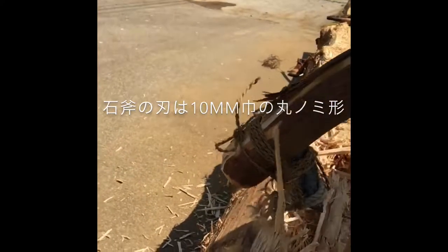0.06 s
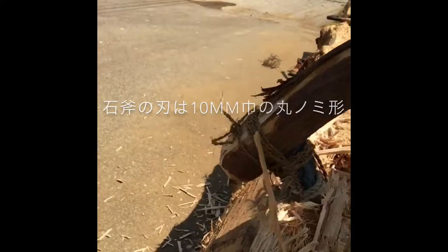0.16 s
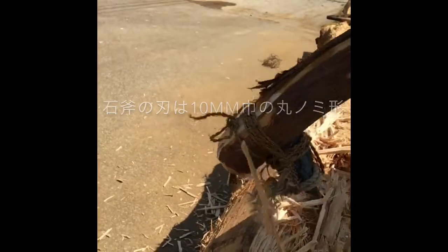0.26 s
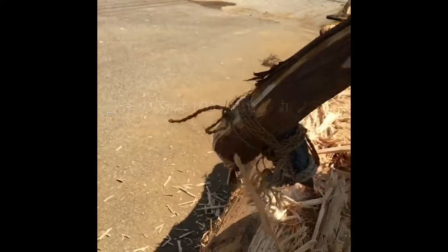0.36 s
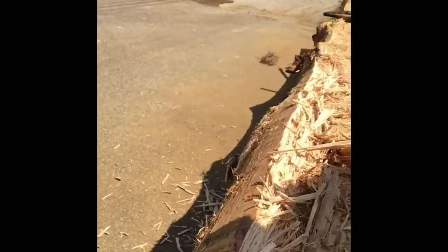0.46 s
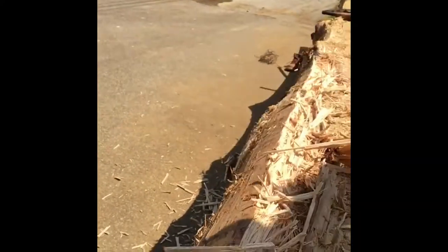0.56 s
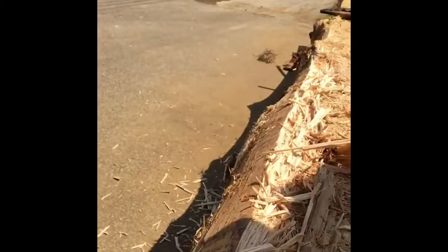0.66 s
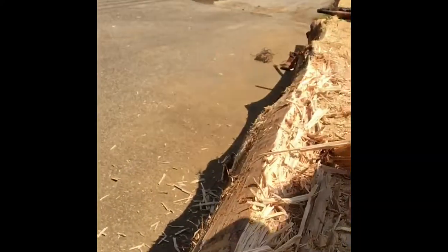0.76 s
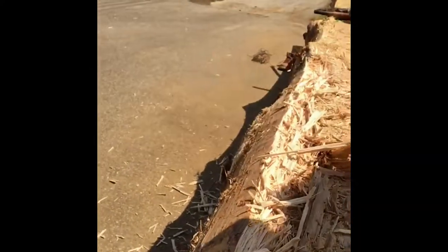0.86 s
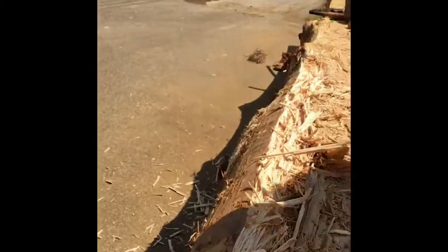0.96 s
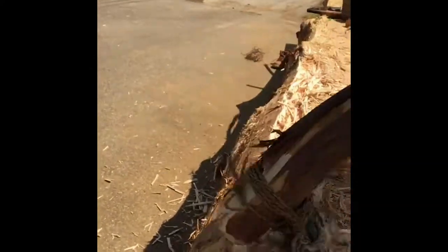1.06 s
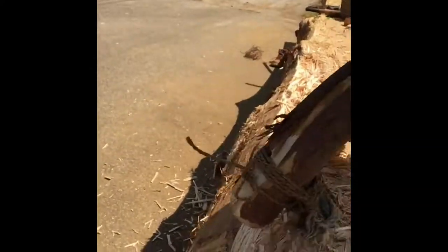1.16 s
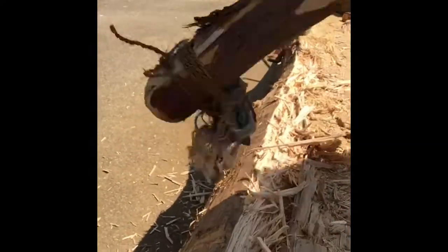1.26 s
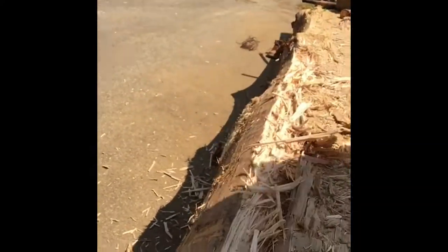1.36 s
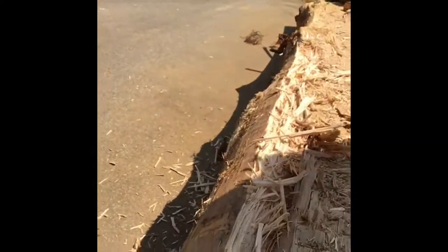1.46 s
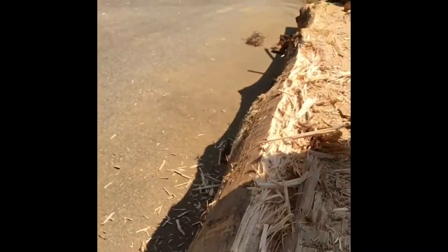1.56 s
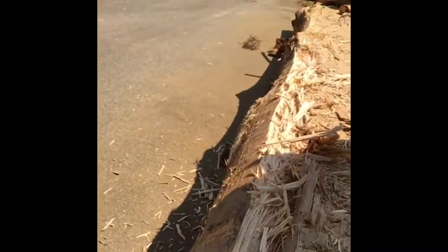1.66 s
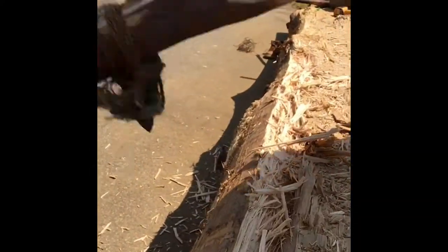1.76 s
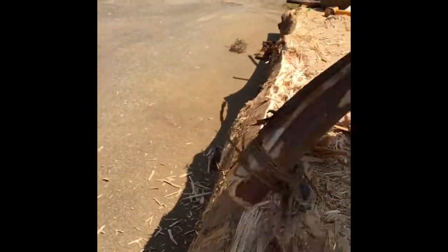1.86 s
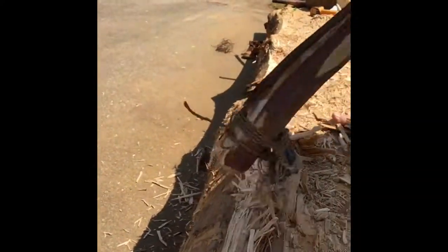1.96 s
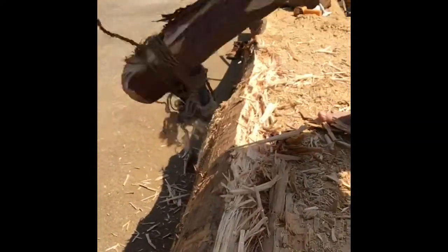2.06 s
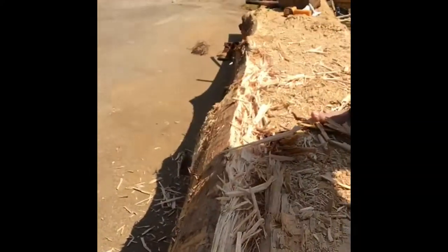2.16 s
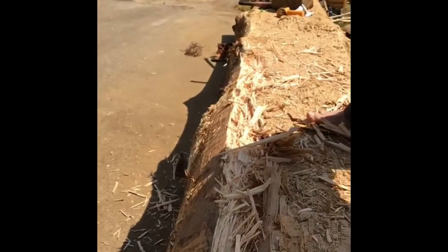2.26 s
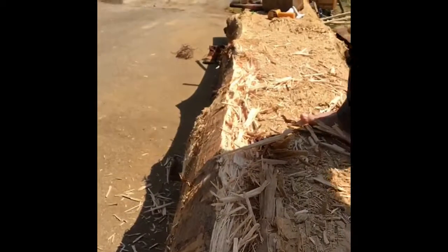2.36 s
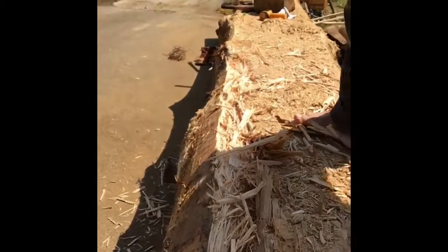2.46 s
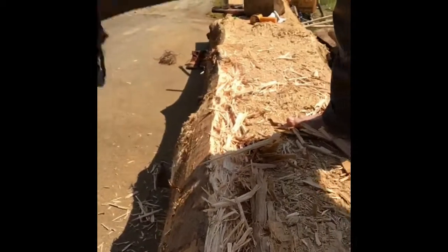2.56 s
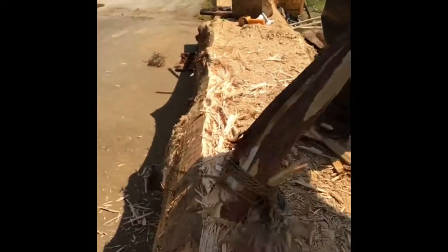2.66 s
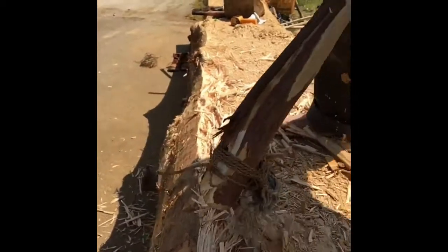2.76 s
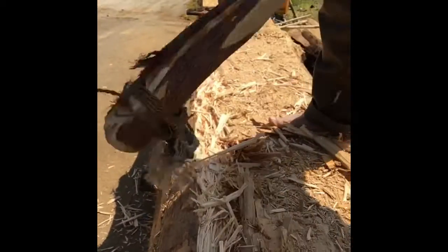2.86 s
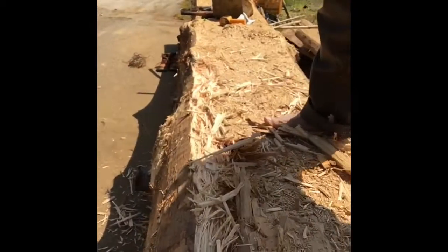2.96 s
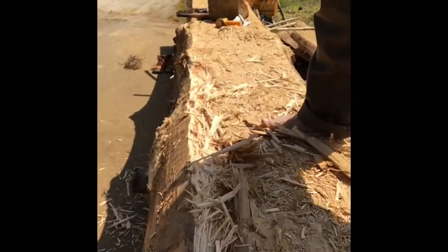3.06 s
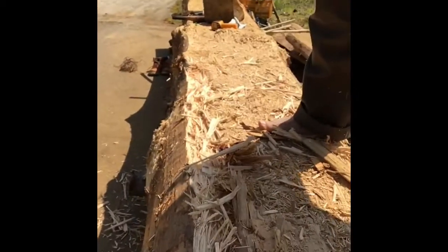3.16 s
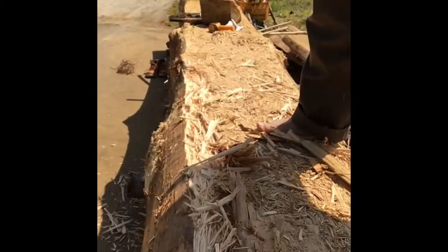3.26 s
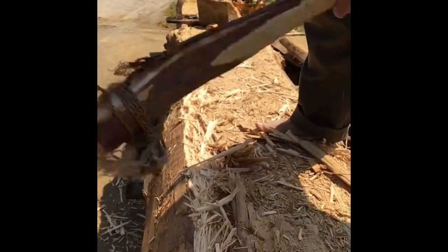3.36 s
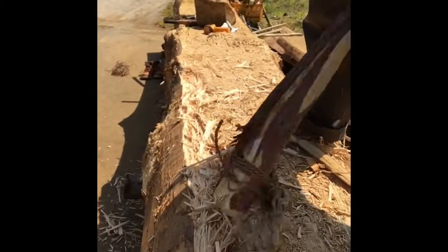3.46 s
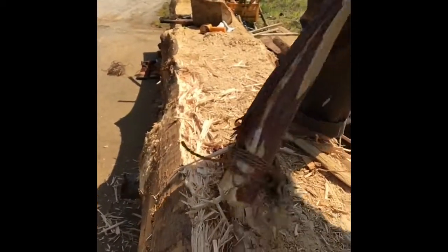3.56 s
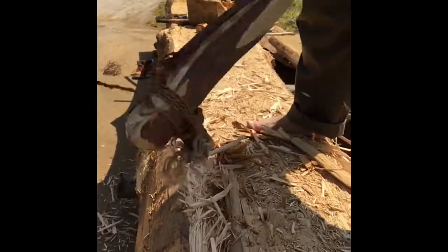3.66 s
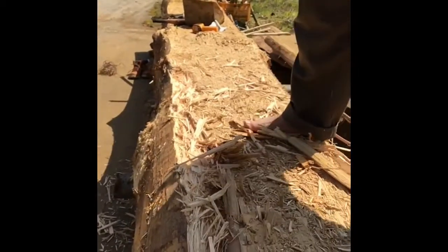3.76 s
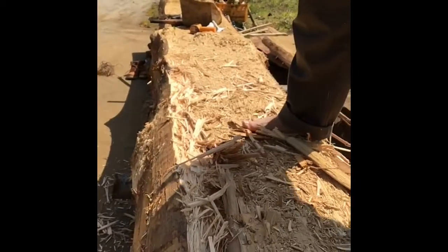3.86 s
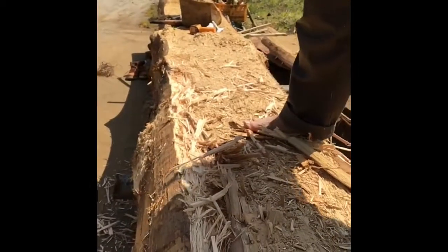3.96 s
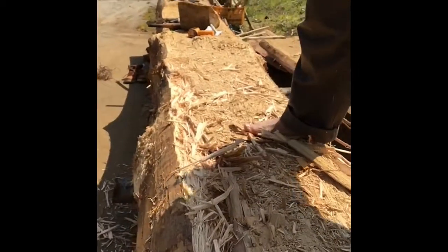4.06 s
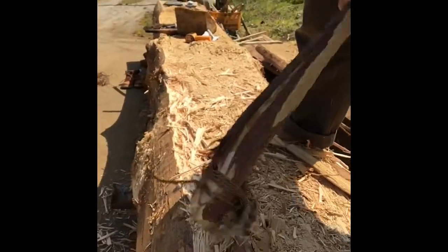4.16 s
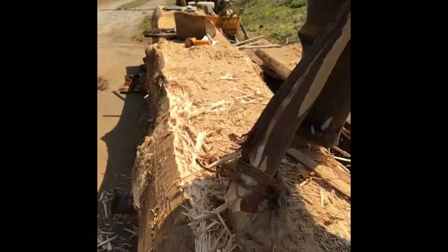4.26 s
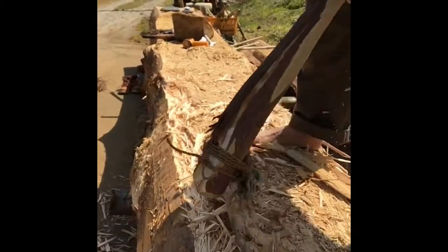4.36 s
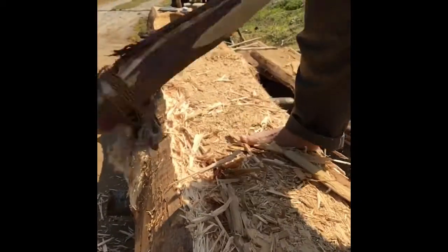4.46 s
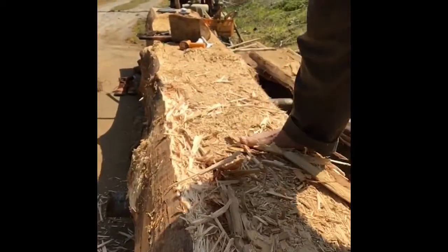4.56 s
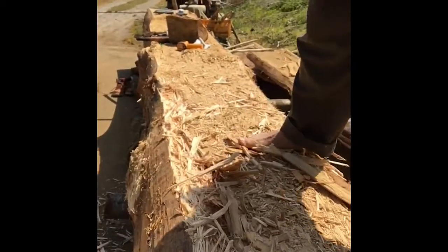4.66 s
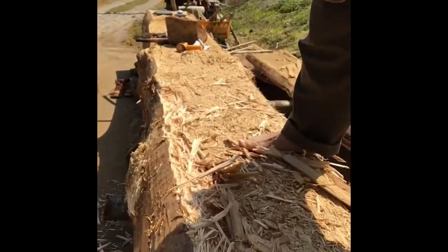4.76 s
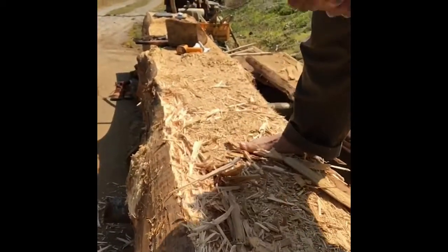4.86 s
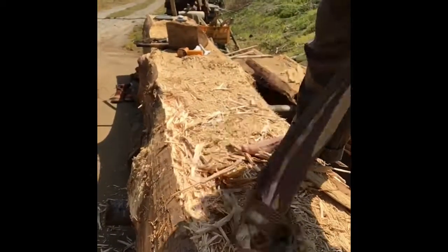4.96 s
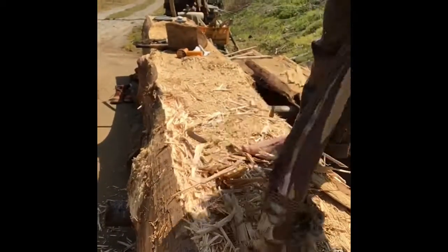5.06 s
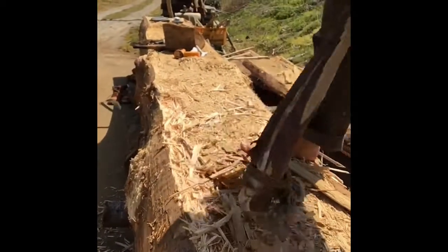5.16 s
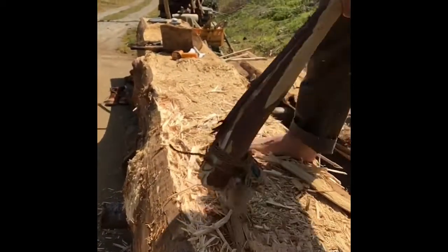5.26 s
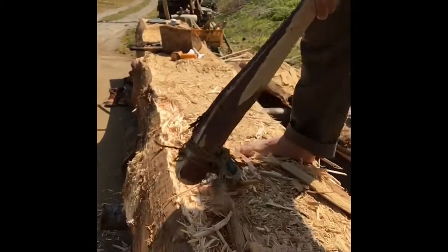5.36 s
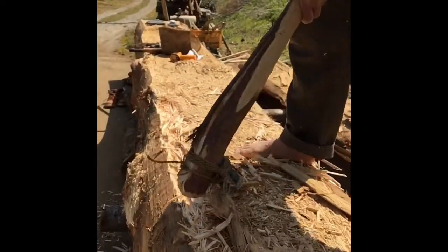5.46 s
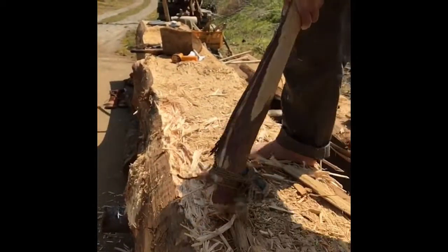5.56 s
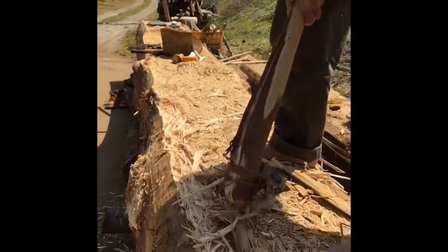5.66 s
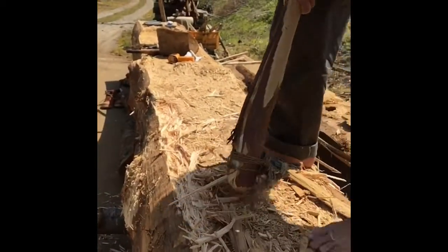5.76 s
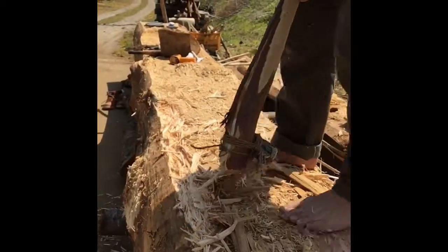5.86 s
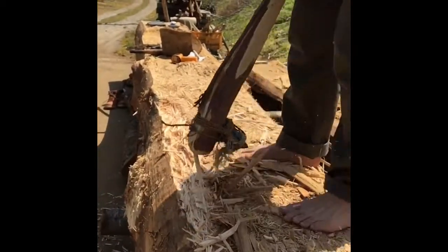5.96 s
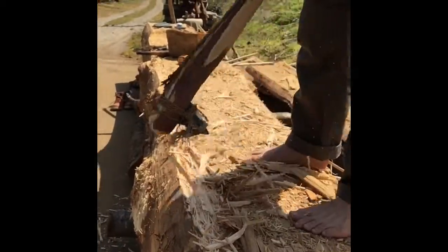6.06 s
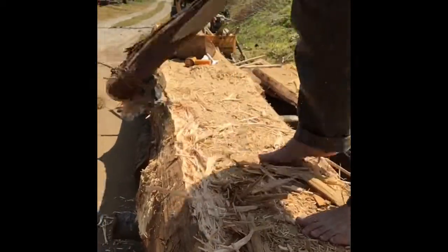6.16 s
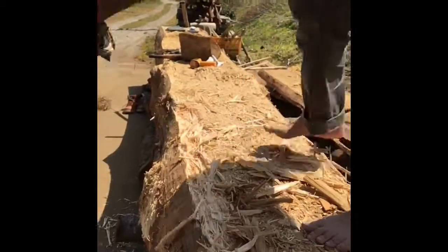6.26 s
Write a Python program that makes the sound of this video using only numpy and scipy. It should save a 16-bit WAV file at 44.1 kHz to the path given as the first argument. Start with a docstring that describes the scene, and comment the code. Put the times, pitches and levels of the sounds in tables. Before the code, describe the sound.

Half a second of silence, then the fading low ring of an earlier blow. A stone adze hits a long log six times, about every 0.8 seconds: a crisp fibrous crunch, a short woody knock and a deep trunk hum. Chips tick between blows. Wind thumps grow on the close, single-channel microphone outdoors; distant traffic roars faintly. Lastly a bare foot drags through crackling shavings.

```python
"""A stone adze is driven into a long log on open ground: each blow crushes fibres, knocks and rings the trunk.
Chips and twigs tick as short noise bursts; shavings rustle as crackles over hiss, also under a dragging bare foot.
Wind rumbles and buffets the microphone; far traffic is a smooth noise roar with faint wavering tones.
After half a second of silence the sound opens on the ring of an earlier blow.
Levels are those of the single layers, before the final gain and rounding."""
import sys
import numpy as np
from scipy import signal
from scipy.fft import rfft, irfft, next_fast_len
from scipy.io import wavfile
from scipy.ndimage import uniform_filter1d

SR = 44100
rng = np.random.default_rng(int(sys.argv[2]) if len(sys.argv) > 2 else 0)


def wav_out(sig):
    """Save sig, one row per channel (or a flat mono array), as 16-bit PCM at SR to the path in sys.argv[1]."""
    wavfile.write(sys.argv[1], SR, np.round(np.clip(np.atleast_2d(sig).T, -1, 1) * 32767).astype(np.int16))


N = 277389  # samples, about 6.3 s
TIME = np.arange(N) / SR
OPEN_S, OPEN_FADE_S = 0.521, 0.033  # silence first, then a fade in


def undb(db):
    """Turn dB into an amplitude factor."""
    return 10 ** (np.asarray(db) / 20)


def unit(x):
    """Scale to rms 1."""
    return x / np.sqrt(np.mean(x ** 2))


def unit_peak(x):
    """Scale to peak 1."""
    return x / np.abs(x).max()


def colour(x, points):
    """Shape a sound by a spectrum of (f/Hz, level/dB) points; outside them it is cut by 60 dB."""
    hz, db = np.transpose(points)
    n = next_fast_len(len(x), True)
    f = np.maximum(np.arange(n // 2 + 1) * SR / n, 1)
    gain = undb(np.interp(np.log(f), np.log(hz), db, left=-60, right=-60))
    return irfft(rfft(x, n) * gain, n)[:len(x)]


def walk(rate):
    """Random levels held 1 / rate s and smoothed twice; their spread is near 1."""
    k = int(SR / rate)
    steps = np.repeat(rng.standard_normal(N // k + 1), k)[:N]
    return 1.5 * uniform_filter1d(uniform_filter1d(steps, k), k)


def curve(points):
    """Read a (t/s, value) table at every sample."""
    return np.interp(TIME, *np.transpose(points))


def add(out, s, x):
    """Mix x into out from time s."""
    i = int(s * SR)
    out[i:i + len(x)] += x[:N - i]


# Blows: t/s, crush level/dB, crush time/s, dullness f/Hz as the edge stops, trunk ring level/dB,
# upper ring level/dB against the trunk, knock level/dB, bright snaps level/dB against the crush,
# change of the second trunk mode level/dB, favoured knock f/Hz
ADZE_BLOWS = [(1.1060, -10, 0.0075, 1920, -7, -12.5, -19.5, -3.5, 0, 330),
              (1.8984, -18, 0.0061, 2140, -12.5, -3, -26.5, 4.5, -6.5, 700),
              (2.7156, -15.5, 0.0089, 2190, -11, -9, -26, 5.5, 0.5, 520),
              (3.4900, -13, 0.01, 1350, -9.5, -3.5, -22.5, 2, 1.5, 1050),
              (4.2620, -18, 0.00797, 1594, -9.5, -9.5, -24.5, 8, 0.5, 1400),
              (5.0442, -13, 0.0048, 1530, -12, -4.5, -24, 2.5, 7, 640)]
# Bending modes of the trunk, with a close pair that beats: f/Hz, level/dB, time to fade 60 dB t/s
TRUNK_MODES = [(150.5, 0, .46), (167.7, -15, .88), (66.3, -14, .46), (157, -13, .25), (196, -9, .09)]
# Higher trunk modes, strong or weak from blow to blow: f/Hz, level/dB, time to fade 60 dB t/s
UPPER_MODES = [(241.5, 0.5, .37), (274.5, -12.5, 0.46)]
# Short knock of haft and wood: f/Hz, level/dB, time to fade 60 dB t/s
KNOCK_MODES = [(297.3, -1.5, 0.063), (344, -14.5, 0.32), (381, -13.5, 0.047), (433.7, -6, 0.23),
               (465.6, -0.5, 0.078), (514, 0, 0.072), (563.3, -10.5, 0.2), (608.6, -0.5, 0.084),
               (705, 2.5, 0.048), (767, -11.5, 0.082), (757, -14, 0.094), (824, -8.5, 0.06),
               (910, -10, 0.09), (1004, 0.5, 0.057), (1070, -10, .05), (1154, -13.5, 0.14),
               (1340, 0, 0.021), (1779, 14, 0.018)]
EARLIER_BLOW_S, EARLIER_BLOW_DB = .342, -7
SHOVE_S, SWELL_S = .0025, 0.021  # length of the push on the trunk, and of the swell of its ring
FAVOUR_DB, FAVOUR_OCTAVES = 6, 0.33  # each blow favours the knock modes near one pitch
KNOCK_SPREAD_DB = 2.5


def adze():
    """Each blow: the crush, a knock of the haft, and a trunk ring that swells in over about 20 ms."""
    out = np.zeros(N)
    shove = np.hanning(int(SHOVE_S * SR))
    add(out, EARLIER_BLOW_S, undb(EARLIER_BLOW_DB) * ring(TRUNK_MODES, shove))
    for (s, crush_db, length, dull_hz, trunk_db, upper_db,
         knock_db, bright_db, beat_db, favour_hz) in ADZE_BLOWS:
        add(out, s, undb(crush_db) * crush(length, dull_hz, bright_db))

        # each blow has its own amount of the second mode of the pair
        trunk = [(hz, db + beat_db * (k == 1), t60) for k, (hz, db, t60) in enumerate(TRUNK_MODES)]
        upper = ring(UPPER_MODES, shove, spread=2.1, detune=0.0026)
        low = ring(trunk, shove) + undb(upper_db) * upper
        swell = np.clip(np.arange(len(low)) / (SWELL_S * SR), 0, 1) ** 2
        add(out, s, undb(trunk_db) * low * swell)

        knock = []
        for hz, db, t60 in KNOCK_MODES:
            octaves = np.log2(hz / favour_hz)
            knock.append((hz, db + FAVOUR_DB * np.exp(-(octaves / FAVOUR_OCTAVES) ** 2), t60))
        knock_sound = ring(knock, np.ones(8), spread=KNOCK_SPREAD_DB, detune=.015)
        add(out, s + 0.594 * length, undb(knock_db) * knock_sound)
    return out


# Colour of the bright snapping fibres: f/Hz, level/dB (per Hz)
SNAP_SPECTRUM = [(240, -44.5), (400, -14.5), (1730, -6.5), (2360, -6.5), (3640, -5), (7400, -13.5),
                 (9180, -12), (10500, -17.5), (13300, -15.5), (16000, -20)]


def crush(length, dull_hz, bright_db):
    """Fibres snap as the edge sinks in: bright while it is fast, duller as it slows, then a weak rattling tail."""
    t = np.arange(SR // 5) / SR
    snaps = rng.standard_normal(len(t)) * undb(2.2 * rng.exponential(size=len(t)))
    # the tail comes in uneven bits of 128 samples
    splinters = undb(5.2 * np.repeat(rng.standard_normal(len(t) // 128 + 1), 128)[:len(t)])

    bright = unit(colour(snaps, SNAP_SPECTRUM))
    bright_end = undb(-60 * np.maximum(t - 0.54 * length, 0) / 0.019)
    bright_tail = splinters * undb(-36.5 - 60 * t / 0.25)
    fast = np.sqrt(np.clip(t / (0.22 * length), 0, 1)) * (bright_end + bright_tail)

    dull_spectrum = [(dull_hz / 4, -10), (dull_hz, 0), (dull_hz * 1.38, -12), (dull_hz * 4, -35)]
    dull = unit(colour(snaps, dull_spectrum))
    dull_end = undb(-60 * np.maximum(t - length, 0) / 0.013)
    dull_tail = splinters * undb(-27.0 - 60 * t / 0.2)
    slow = np.clip(t / (1.21 * length), 0, 1) ** 2 * (dull_end + dull_tail)

    # the many close modes of the split wood blur into a hollow rumble
    hollow = unit(colour(snaps, [(180, -21.5), (300, -1), (520, 2.5), (800, -13), (1600, -16.5)]))
    late = np.clip(t / (5.3 * length), 0, 1) ** 2 * undb(-11.5 - 60 * t / 0.23)
    return undb(bright_db) * bright * fast + dull * slow + hollow * late


def ring(modes, push, spread=0., detune=0.):
    """A push of area 1 sets fading tones going; each tone's level (dB) and pitch are varied at random."""
    t = np.arange(SR) / SR
    chance = rng.standard_normal((len(modes), 2))
    free = np.zeros(len(t))
    for k, ((hz, db, t60), (louder, higher)) in enumerate(zip(modes, chance)):
        fade = undb(db + spread * louder - 60 * t / t60)
        tone = np.sin(2 * np.pi * hz * (1 + detune * higher) * t)
        free += (-1) ** k * fade * tone  # every other mode starts the opposite way
    return signal.fftconvolve(free, push / np.abs(push).sum())


# Chips and twigs, and at 1.103 s a sharp crack at the edge as the first blow lands: t/s, peak level/dB, ring
# f/Hz, length t/s, treble level/dB
CHIP_TICKS = [(0.783, -40.5, 2670, 0.00082, -13), (0.854, -38.5, 2380, 0.0053, 2),
              (0.929, -38, 3050, 0.0022, -3), (0.99, -42, 5440, 0.00092, -6),
              (1.048, -28.5, 2970, 0.0016, -7), (1.088, -35.5, 2300, 0.0012, -15),
              (1.103, -18, 4000, .0006, 0), (1.13, -28.5, 6000, .0012, 0), (1.289, -40, 8900, 0.0028, 12),
              (1.321, -41, 3000, .0017, 7), (1.4, -41, 4520, .0037, -6), (1.435, -39.5, 2110, 0.0016, -11),
              (1.479, -34.5, 4250, 0.0031, 0), (1.558, -42.5, 8900, 0.00066, 1),
              (1.728, -34, 1700, 0.0015, -5), (1.878, -34.5, 3240, 0.00086, -6),
              (1.938, -35, 3200, .0014, -8), (1.987, -37, 2520, 0.0032, -12),
              (2.017, -38, 1440, 0.0023, -21), (2.136, -43, 2530, 0.0022, -15),
              (2.219, -31, 8940, 0.0025, -8), (2.266, -28.5, 2570, 0.013, -1), (2.527, -39, 4300, 0.003, 0),
              (2.676, -40, 6500, 0.001, 4), (2.781, -27, 2200, 0.0018, -13),
              (2.838, -20.5, 2670, 0.0017, -11), (2.986, -17, 2920, 0.0011, -14.5),
              (3.065, -35, 1160, 0.006, -22), (3.192, -45.5, 6500, 0.0043, 2),
              (3.234, -39.5, 2830, 0.0029, -13.5), (3.265, -33, 6100, 0.0024, -14),
              (3.375, -43.5, 6900, 0.0024, -1), (3.845, -33.5, 3470, 0.0017, -1),
              (4.241, -41, 3500, 0.0013, -15), (4.284, -36.5, 7000, .0015, 4),
              (4.593, -39.5, 4930, 0.0036, -1), (4.67, -39.5, 7050, 0.0018, -2),
              (4.82, -38, 3570, 0.00097, -6), (5.287, -32, 2200, 0.00098, -15),
              (5.383, -39, 6040, 0.016, -1), (5.48, -39.5, 6000, 0.0014, -1),
              (5.647, -30, 1990, 0.006, -20), (5.655, -20.5, 7500, 0.00057, -5),
              (5.66, -23.5, 5700, 0.0051, 0), (5.674, -17, 2360, 0.0033, 2), (5.741, -31, 5400, 0.0053, 7),
              (5.781, -24, 6960, .002, -2), (6.005, -37, 6000, 0.0035, -3),
              (6.076, -30.5, 4700, 0.00063, -5), (6.168, -37, 9900, 0.0014, 11),
              (6.222, -36, 4270, 0.0025, -4)]
# fainter ticks fall at random; these are their middle values
FAINT_TICKS, FAINT_DB, FAINT_SPREAD_DB = 80, -49, 3
FAINT_HZ, FAINT_S, FAINT_TREBLE_DB = 5500, .0016, -3
RING_DB = -6  # pure note against the noise of a tick


def chips():
    """Each tick is a short burst of noise, lifted where the chip rings, with some woody body below."""
    out = np.zeros(N)
    t = np.arange(-256, 1792) / SR
    when = rng.uniform(OPEN_S, TIME[-1], FAINT_TICKS)
    size, pitch, span, tilt = rng.standard_normal((FAINT_TICKS, 4)).T
    faint = zip(when,
                FAINT_DB + FAINT_SPREAD_DB * size,
                np.clip(FAINT_HZ * 1.4 ** pitch, 1000, 10000),
                FAINT_S * 2.1 ** span,
                FAINT_TREBLE_DB + 5 * tilt)
    for s, db, hz, length, treble_db in list(CHIP_TICKS) + list(faint):
        # a quick rise before t = 0, then the fade
        shape = np.exp(-np.abs(t) / np.where(t < 0, .0003, max(length, .0003)))
        burst = rng.standard_normal(len(t)) * shape
        tick = colour(burst, [(hz / 9, -22), (hz / 5, -11), (hz / 1.3, -5), (hz, 0),
                              (hz * 1.6, treble_db - 4), (16500, treble_db - 7.5)])
        note_fade = np.exp(-np.abs(t) / min(length, 4 / hz))
        note = (t > 0) * np.sin(2 * np.pi * hz * t) * note_fade
        add(out, s + t[0], undb(db) * unit_peak(unit_peak(tick) + undb(RING_DB) * note))
    return out


# Colour of the dry shavings: f/Hz, level/dB (per Hz)
RUSTLE_SPECTRUM = [(470, -41.5), (800, -18.5), (1750, -2.5), (1920, -2.5), (2630, -1), (3800, -2),
                   (13800, -4.5), (15900, -12), (16500, -44.5)]
# Edges of the bands that flicker alone: f/Hz
RUSTLE_EDGES = [400, 2000, 4000, 7500, 11000, 17000]
GRAIN_DB, BIGGEST_GRAIN_DB = 4, 14  # mean boost of a crackle and its limit
DRAG_TILT_DB = -2.5  # per band, for the heaviest stirring
RUSTLE_FLICKER_DB = 2.5


def shavings(db):
    """Dry shavings shift: small crackles over a soft hiss, denser and duller when a foot drags through them."""
    heavy = np.interp(db, [-62, -46], [0, 1])
    rate = 500 + 2000 * heavy  # crackles per s
    grains = undb(np.minimum(GRAIN_DB * rng.exponential(size=N), BIGGEST_GRAIN_DB))
    crackle = (rng.random(N) < rate / SR) * grains * rng.standard_normal(N) / np.sqrt(rate)
    whole = colour(unit(crackle) + 1.3 * rng.standard_normal(N), RUSTLE_SPECTRUM)
    rustle = np.zeros(N)
    for k, (lo, hi) in enumerate(zip(RUSTLE_EDGES, RUSTLE_EDGES[1:])):
        band_db = 1.8 * walk(60) + DRAG_TILT_DB * heavy * (k - 2)
        rustle += colour(whole, [(lo, 0), (hi, 0)]) * undb(band_db)
    return unit(rustle) * undb(db + RUSTLE_FLICKER_DB * walk(110))


# Shavings stirred by the blows and the foot: start t/s, lasting t/s, level/dB, fading in dB per s
SHAVING_STIRS = [(0.496, 0.22, -65, 4), (0.756, 0.39, -73, -5), (1.09, 0.43, -62.5, 4),
                 (1.62, 0.13, -67.5, 1), (1.896, 0.11, -56.5, 40.5), (2.04, 0.69, -67, 0),
                 (2.719, .4, -66, 3.5), (3.487, 0.44, -65.5, 13.5), (4.248, 0.38, -65, 5.5),
                 (5.029, 0.4, -63, 0.5), (5.523, 0.097, -66, -3), (5.63, 0.13, -47, 0.5),
                 (5.772, 0.18, -42.5, 22.5), (5.928, .04, -49, 1), (5.995, 0.21, -61.5, 13),
                 (6.198, 0.036, -54, 13)]
STILL_DB = -77  # between stirs
STIR_ATTACK_S, STIR_RELEASE_DB_S = .012, 299


def stirring():
    """Level of the rustle in dB: each stir sets in fast, changes slowly while it lasts, then settles."""
    power = undb(STILL_DB) ** 2
    for s, lasts, db, fading_db in SHAVING_STIRS:
        t = np.maximum(TIME - s, 0)
        onset = np.minimum(t / STIR_ATTACK_S, 1)
        settling_db = STIR_RELEASE_DB_S * np.maximum(t - lasts, 0)
        power = power + (onset * undb(db - fading_db * t - settling_db)) ** 2
    return 10 * np.log10(power)


# Course of the wind rumble, before gusts and vent: t/s, level/dB
WIND_LEVEL = [(.6, -50.5), (1.1, -50), (1.66, -52), (2.3, -47), (2.63, -40.5), (2.85, -38.5), (3.3, -41.5),
              (3.44, -34.5), (3.78, -40), (4.1, -42.5), (4.25, -29), (4.41, -45.5), (4.65, -33.5),
              (4.8, -45), (5.1, -35.5), (5.35, -34.5), (5.58, -46), (5.79, -29), (5.96, -30), (6.14, -40.5),
              (6.25, -37.5)]
# Hard buffets on the microphone, before the vent: t/s, peak level/dB, f/Hz, width in cycles
WIND_BUFFETS = [(2.363, -36, 82, 4.4), (2.419, -25.5, 71.5, 1.2), (2.552, -36, 54, 2),
                (2.942, -16, 75, 1.27), (3.234, -31.5, 82.5, 4.3), (3.37, -31, 57.7, 2),
                (4.2, -25, 60.5, 6.5), (4.593, -20, 57.5, 1.9), (4.631, -14, 135, 1.14),
                (4.665, -22, 149, 1.6), (4.705, -23.5, 118, 1.1), (4.98, -13.5, 133, 0.9),
                (5, -16.5, 77.5, 3.6), (5.583, -13.5, 131, 1.44), (5.71, -22, 70, 0.56),
                (5.754, -26, 203, 3.2), (5.792, -21, 105, 1.7), (5.824, -11.5, 83, 0.92),
                (5.874, -10, 111, 0.63), (5.917, -11.5, 111, 1.14), (6.058, -13.5, 98, 1.04),
                (6.127, -26.5, 73, 2.4), (6.212, -27, 70, 1.7)]
GUST_DB = 3
VENT_HZ = 43


def wind(db):
    """Turbulent rumble and single hard buffets; the vent of the capsule bleeds off the slowest pressure."""
    rumble = colour(rng.standard_normal(N), [(15, -31.0), (35, -3.5), (62, 2.0),
                                             (110, -5.5), (200, -17.5), (400, -35.5)])
    out = unit(rumble) * undb(db + GUST_DB * walk(9.3))
    t = np.arange(-4096, 4096) / SR
    for s, peak_db, hz, cycles in WIND_BUFFETS:
        turns = hz * t * (1 - 0.21 * np.tanh(t * hz))  # the eddy hits fast and drags out
        hump = np.exp(-(3.38 * t * hz / cycles) ** 2)
        add(out, s + t[0], -undb(peak_db) * np.cos(2 * np.pi * turns) * hump)
    return signal.sosfilt(signal.butter(2, VENT_HZ, "high", fs=SR, output="sos"), out)


# Course of the far roar, before ROAR_GAIN_DB and the swelling: t/s, level/dB
ROAR_LEVEL = [(.6, -64), (1.3, -61), (2.6, -60), (3.4, -61), (3.8, -58), (4.14, -54.5), (4.38, -58.5),
              (4.6, -53.5), (5.1, -58.5), (5.4, -56.5), (6.29, -55)]
# Colour of the roar: f/Hz, level/dB (per Hz)
ROAR_SPECTRUM = [(90, -33), (150, -0.5), (400, -5.5), (1200, -10), (2500, -17.5), (4200, -29),
                 (6000, -46.5), (9000, -63.5)]
# Faint wavering tones far off: start t/s, end t/s, middle f/Hz, middle level/dB
FAR_TONES = [(.5, 1.1, 598, -66), (2.5, 2.637, 591, -62), (1.25, 1.4, 2830, -72), (1.76, 1.92, 2940, -66),
             (2.42, 2.687, 2940, -68), (3.1, 3.39, 2930, -67)]
ROAR_GAIN_DB = 5  # gain of the whole roar


def traffic(db):
    """A smooth far roar that swells, with faint tones wavering in pitch and level."""
    roar = unit(colour(rng.standard_normal(N), ROAR_SPECTRUM))
    out = roar * undb(db + ROAR_GAIN_DB + walk(10))
    for start, end, hz, tone_db in FAR_TONES:
        on = np.clip(np.minimum(TIME - start, end - TIME) / 0.04, 0, 1)
        turns = np.cumsum(hz * (1 + .001 * walk(10))) / SR
        out += on * undb(tone_db + walk(20)) * np.sin(2 * np.pi * turns)
    return out


def scene():
    """All sources together, from the adze to the far traffic, in one channel."""
    near = adze() + chips() + shavings(stirring())
    far = wind(curve(WIND_LEVEL)) + traffic(curve(ROAR_LEVEL))
    return (near + far)[None]


GAIN_DB, CEILING, TOP_HZ = 1.5, .92, 16300


def record(dry):
    """A fade opens the sound, the loudest peaks are rounded and the top is cut."""
    opened = undb(GAIN_DB) * dry * np.clip((TIME - OPEN_S) / OPEN_FADE_S, 0, 1)
    rounded = opened / (1 + (opened / CEILING) ** 4) ** (1 / 4)
    return signal.sosfilt(signal.ellip(8, .2, 70, TOP_HZ, fs=SR, output="sos"), rounded)


dry = scene()
out = record(dry)
wav_out(out)
```